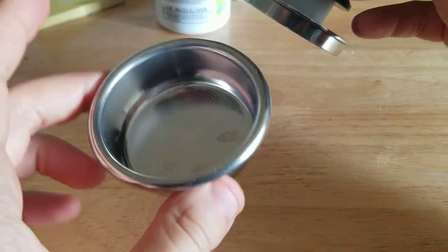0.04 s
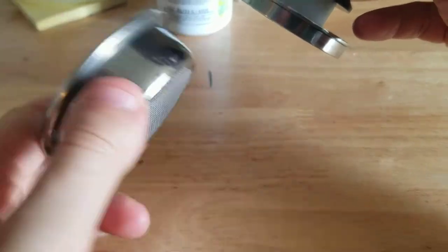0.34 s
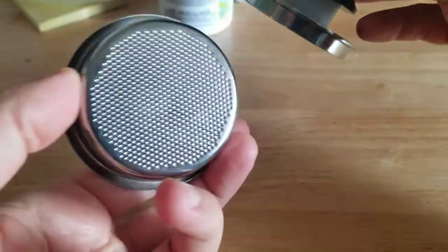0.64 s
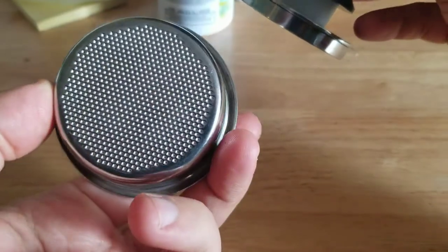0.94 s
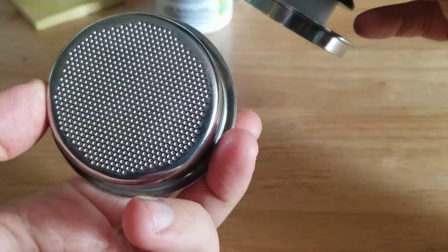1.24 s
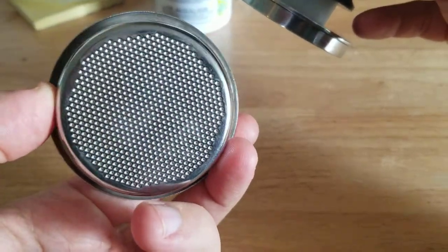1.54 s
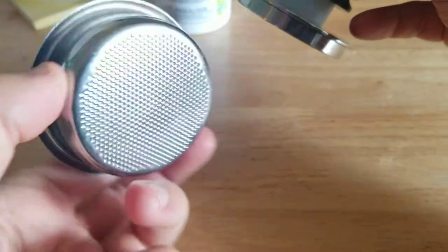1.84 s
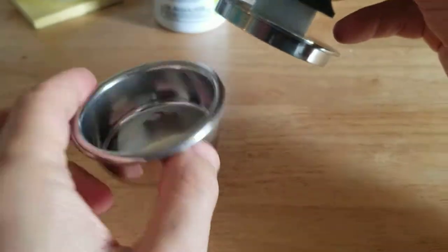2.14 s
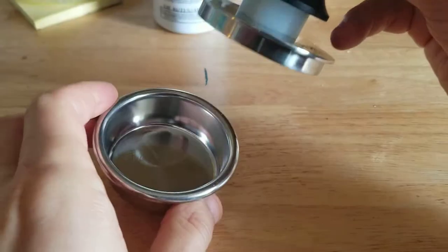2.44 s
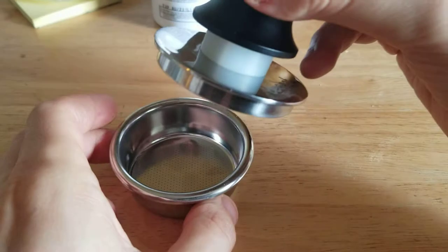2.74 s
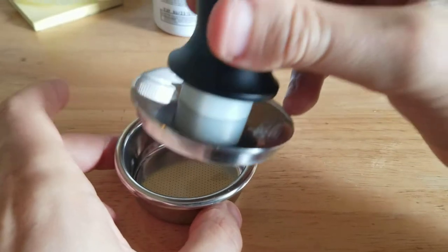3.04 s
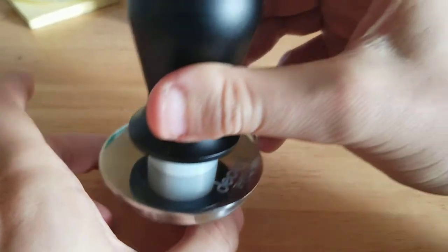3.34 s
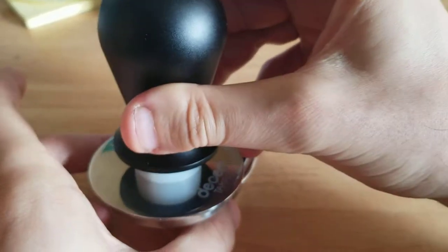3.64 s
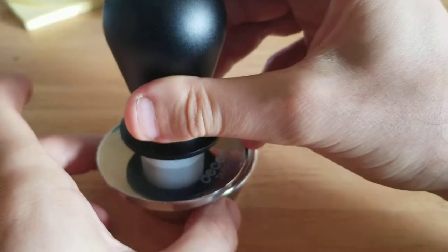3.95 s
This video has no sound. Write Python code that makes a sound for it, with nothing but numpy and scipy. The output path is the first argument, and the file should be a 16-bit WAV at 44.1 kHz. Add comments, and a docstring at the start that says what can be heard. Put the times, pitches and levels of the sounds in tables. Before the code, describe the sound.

A steel tamper clacks sharply into an espresso basket at about 3.5 seconds, with a brief ring and table thump, then a lighter click at 3.9. Earlier, fingers faintly rub the basket, with soft bumps, until about 2 seconds. It lands on a wooden table with a ringing knock at 2.4 and scrapes lightly at 2.7. Everything is close, over a low room hum.

```python
"""Espresso basket and tamper on a wooden table

A steel basket is turned twice in the fingers, set down and nudged; a steel tamper clacks into it,
thumps the table and shifts once more. Impacts excite damped modes of steel and wood, and sliding
friction gives swells of noise. The handling is close, its treble mostly on the left; a small room hums."""
import sys
import numpy as np
from scipy import signal
from scipy.fft import rfft, irfft
from scipy.io import wavfile

SR = 44100
rng = np.random.default_rng(int(sys.argv[2]) if len(sys.argv) > 2 else 0)


def file_out(sig):
    """Save sig as 16-bit WAV at sys.argv[1]."""
    # one column per channel
    cols = np.atleast_2d(sig).T
    # limit, then scale
    lim = np.clip(cols, -1, 1)
    pcm = np.round(lim * 32767).astype(np.int16)
    wavfile.write(sys.argv[1], SR, pcm)


N = 176400
T = np.arange(N) / SR
HZ = np.maximum(np.fft.rfftfreq(N, 1 / SR), 1)

# Modes of the free basket and of the table top: pitch_hz, level_db, t60_s
BASKET_MODES = [(2062, -39.5, .28), (5087, -55.5, .32), (2950, -42, .09), (7200, -69, .2), (8290, -63, .15),
                (8436, -67, .22), (9636, -69, .25), (11160, -51, .13), (11290, -46, .085),
                (12470, -58, .14), (15580, -57, .15)]
TABLE_MODES = [(203, -34, 0.075), (382, -43.5, 0.17), (487, -52, 0.29), (592, -46, 0.22), (721, -46, .11),
               (879, -30, 0.047), (1066, -51, 0.048), (1158, -34.5, 0.11), (1615, -35, 0.063)]
# Level difference of close sounds: frequency_hz, left_minus_right_db
PAN = [(200, -1), (1100, -9), (2000, 0.5), (3500, 2.5), (4300, 9.5), (6000, 14), (9000, 21.5), (12000, 9),
       (15000, 16)]
# Coherence of the two channels: frequency_hz, correlation
COHERENCE = [(60, 1), (250, 0.72), (600, 0.34), (1200, 0.017), (5000, .1), (15000, .05)]


def from_db(db):
    """Amplitude grows tenfold every 20 dB."""
    return 10 ** (np.asarray(db) / 20)


def unit_rms(x):
    """Normalisation to unit mean power."""
    return x / np.sqrt(np.mean(x ** 2) + 1e-20)


def at_hz(points, hz):
    """Interpolation on a log-frequency axis."""
    frequencies, values = np.transpose(points)
    return np.interp(np.log(hz), np.log(frequencies), values)


def panned(db):
    """A level difference splits evenly into left and right gains."""
    return from_db(np.array([[.5], [-.5]]) * db)


def noise(spectrum):
    """Partly coherent stereo noise: alike in the bass, nearly independent in the treble."""
    mid, side = rfft(rng.standard_normal((2, N)))
    alike = at_hz(COHERENCE, HZ)
    pair = np.sqrt(1 + alike) * mid + np.sqrt(1 - alike) * side * [[1], [-1]]
    return unit_rms(irfft(pair * from_db(at_hz(spectrum, HZ)), N))


def close_noise(spectrum, lean=1):
    """A level difference between the channels places noise at the hands."""
    return irfft(rfft(noise(spectrum)) * panned(lean * at_hz(PAN, HZ)), N)


def driven(response):
    """Forced vibration: white noise shaped by a frequency response."""
    return unit_rms(irfft(rfft(rng.standard_normal((2, N))) * response, N))


def drift(rate_hz):
    """Low-passed noise gives a random fluctuation of unit rms."""
    return unit_rms(irfft(rfft(rng.standard_normal(N)) / (1 + (HZ / rate_hz) ** 2), N))


def blows(times, levels_db, t60_s, attack_s):
    """Exponential decays after impacts add in power, as incoherent sounds do."""
    ages = np.maximum(T - np.array(times)[:, None], 0)
    decays = from_db(np.array(levels_db)[:, None] - np.minimum(60 * ages / t60_s, 200))
    rises = 1 - np.exp(-ages / attack_s)
    return np.sqrt(((decays * rises) ** 2).sum(0))


def strokes(slides, fade_db):
    """Gaussian swells of sliding contact, each fade_db below its peak at start and end."""
    envelope = np.zeros(N)
    for start, peak, end, db in slides:
        away = np.where(T < peak, (peak - T) / (peak - start), (T - peak) / (end - peak))
        envelope += from_db(db - np.minimum(fade_db * away ** 2, 200))
    return envelope


def ring(times, levels_db, modes, vary_db, accents=None):
    """Modal superposition: blows start damped sines; the contact point accents a band (hz, db)."""
    out, t = np.zeros((2, N + SR)), T[:SR]
    accent_octaves = .3
    for k, (start_s, db) in enumerate(zip(times, levels_db)):
        onset = int(start_s * SR)
        for hz, mode_db, t60_s in modes:
            boost_db = 0
            if accents is not None:
                accent_hz, accent_db = accents[k]
                boost_db = accent_db * np.exp(-(np.log2(hz / accent_hz) / accent_octaves) ** 2)
            phase = rng.choice([-1, 1]) * np.arccos(at_hz(COHERENCE, hz)) * np.array([[.5], [-.5]])
            gain = from_db(db + mode_db + boost_db + vary_db * rng.standard_normal())
            envelope = gain * np.exp(-np.log(1000) * t / t60_s) * (1 - np.exp(-2 * hz * t))
            tone = envelope * np.sin(2 * np.pi * hz * t + phase)
            out[:, onset:onset + SR] += panned(at_hz(PAN, hz)) * tone
    return out[:, :N]


def in_room(x, level_db=-9, t60_s=0.19, delay_s=0.0025):
    """Reverberation: dense reflections interfere with ringing tones and make them flutter."""
    t = T[:SR // 2]
    echoes = rng.standard_normal((2, len(t))) * np.exp(-np.log(1000) * t / t60_s) * (t > delay_s)
    echoes /= np.sqrt((echoes ** 2).sum(1, keepdims=True))
    return x + from_db(level_db) * signal.fftconvolve(x, echoes, axes=1)[:, :N]


def tamper_clacks():
    """Steel-on-steel impacts excite the basket's modes and pass through to a low mode of the table."""
    # Contacts: start_s, clack_db, ring_db, thump_db, accent_hz, accent_db
    contacts = [(3.5466, -3, -14, -22, 12000, -7), (3.5486, 0, -2.5, -1.5, 11400, 1.5),
                (3.5525, -17, -16, -17, 6400, 10), (3.602, -28, -30, -24, 4200, 14),
                (3.912, -15.5, -23, -16, 4900, 19), (3.928, -27, -39, -20, 4200, 19)]
    # Modes of the basket holding the tamper: pitch_hz, level_db, t60_s
    loaded_modes = [(1670, -39.5, 0.12), (1967, -35, 0.16), (2308, -38, 0.14), (3020, -38, 0.13),
                    (4157, -26.5, 0.022), (4334, -35, 0.037), (5540, -34.5, 0.091), (6350, -30, 0.048),
                    (7311, -34.5, 0.15), (7090, -42, 0.064), (8760, -38, 0.056), (10450, -36, 0.087),
                    (10900, -45, 0.109), (11330, -29.5, 0.16), (11310, -37, .09), (11400, -34, 0.092),
                    (12000, -32, .06), (12470, -32, 0.12), (14300, -31.5, .07), (14690, -48.5, .09)]
    # Spectra of the clack and of its reverberation: frequency_hz, density_db
    clack_spectrum = [(300, -15), (1200, -15), (1800, 2), (3000, -6), (4400, -2), (5200, -13), (6400, 2.5),
                      (9400, -26.5), (11400, 7.5), (13200, 0.5), (14500, -4), (16000, -4)]
    room_spectrum = [(300, 7), (1100, -7.5), (1800, 7), (3000, 6.5), (5000, -6), (7000, -4), (9300, -18),
                     (11400, -13), (13200, -11), (16000, -5)]
    times, clack_db, ring_db, thump_db, accent_hz, accent_db = np.transpose(contacts)
    clack = blows(times, clack_db - 21, t60_s=0.033, attack_s=0.00045) * close_noise(clack_spectrum)
    clack *= from_db(2 * drift(700))
    room = blows(times, clack_db - 40, t60_s=0.31, attack_s=0.0054) * close_noise(room_spectrum, 0.94)
    thump = ring(times, thump_db, modes=[(210.7, -22.5, 0.12)], vary_db=2)
    rings = ring(times, ring_db, loaded_modes, vary_db=1.5, accents=list(zip(accent_hz, accent_db)))
    return clack + room + thump + in_room(rings)


def tamper_rub(width_hz=135):
    """Friction of the tamper drives the resonances of the basket wall."""
    # Rubbing strokes: start_s, peak_s, end_s, level_db
    rubs = [(3.62, 3.7, 3.8, -68), (3.869, 3.982, 4.08, -60)]
    # Wall resonances: pitch_hz, level_db
    resonances = [(1620, 4), (1938, -4.5), (5550, -3.5), (7340, -6), (10450, -2)]
    wall = sum(from_db(db) / (1 + 2j * (HZ - hz) / width_hz) for hz, db in resonances)
    return strokes(rubs, fade_db=15.5) * driven(wall * panned(0.69 * at_hz(PAN, HZ)))


def basket_rattle():
    """Contact chatter: under the tamper the basket strikes the wood repeatedly."""
    # Contacts: start_s, level_db
    contacts = [(3.55, -37), (3.557, -30), (3.6018, -38), (3.915, -43.5), (3.926, -43)]
    # Rattle spectrum: frequency_hz, density_db
    spectrum = [(400, -25.5), (1200, -10), (1800, 6), (2500, 2.5), (3400, -4.5), (4300, -0.5), (5200, -22),
                (16000, -39)]
    return blows(*np.transpose(contacts), t60_s=0.04, attack_s=0.0012) * close_noise(spectrum)


def basket_landing():
    """The rim's impact on wood gives a broadband knock and leaves basket and table in free vibration."""
    # Rim contacts: start_s, level_db
    landings = [(2.4393, 0), (2.4445, -11.5)]
    # Wooden knock: frequency_hz, density_db
    spectrum = [(120, -14), (300, 4), (620, 0.5), (850, -4), (1500, 1), (2300, 1), (3000, -10.5),
                (4000, -24.5), (6500, -29.5), (9000, -57), (16000, -37)]
    times, db = np.transpose(landings)
    knock = blows(times, db - 30, t60_s=0.056, attack_s=0.00054) * close_noise(spectrum)
    room = blows(times, db - 40, t60_s=0.26, attack_s=0.0055) * close_noise(spectrum, lean=0.39)
    rings = ring(times[:1], [0], BASKET_MODES + TABLE_MODES, vary_db=.5)
    return knock + room + in_room(rings)


def basket_nudge():
    """Sliding friction makes a scrape; a catch on the wood sets table and basket ringing."""
    # Slides: start_s, peak_s, end_s, level_db
    slides = [(2.604, 2.634, 2.84, -67), (2.657, 2.686, 2.7, -65), (2.687, 2.706, 2.76, -86)]
    # Steel sliding on wood: frequency_hz, density_db
    spectrum = [(250, -11), (450, 8), (700, -7), (900, -3.5), (1250, 0.5), (1550, -15), (3000, -32),
                (9000, -37), (11200, -20), (16000, -38)]
    # The catch: start_s, table_db, basket_db
    catch = [(2.669, -26.5, -33.5)]
    scrape = strokes(slides, fade_db=12.5) * close_noise(spectrum) * from_db(1.2 * drift(150))
    times, table_db, basket_db = np.transpose(catch)
    wood = ring(times, table_db, TABLE_MODES, vary_db=1, accents=[(930, 10)])
    steel = ring(times, basket_db, BASKET_MODES, vary_db=1, accents=[(9800, 19)])
    return scrape + wood + steel


def finger_slides(half_width_hz=640):
    """Skin friction makes a grainy hiss; where a fingertip catches, the steel resonates faintly."""
    # Turning strokes: start_s, peak_s, end_s, level_db
    turns = [(0.314, 0.345, 0.35, -77.5), (0.328, .5, 0.63, -69), (1.825, 1.9, 1.98, -72.5),
             (1.896, 2.007, 2.15, -67.5)]
    # Skin on steel: frequency_hz, density_db
    skin = [(1500, -9), (3500, -12), (5000, -10.5), (6100, -1.5), (8500, -12), (11000, 0), (13000, 5.5),
            (16000, -4.5)]
    # Fingertip catches: start_s, peak_s, end_s, pitch_hz, level_db
    catches = [(0.476, 0.544, 0.64, 6440, -75), (1.88, 1.957, 2.0, 6440, -65.5),
               (2.894, 2.923, 2.96, 11500, -71)]
    out = strokes(turns, fade_db=8) * close_noise(skin, lean=1.46)
    out *= from_db(-3.5 + 0.94 * drift(22) + 1.4 * drift(440))
    for start, peak, end, hz, db in catches:
        singing = driven(panned(at_hz(PAN, HZ)) / (1 + ((HZ - hz) / half_width_hz) ** 2))
        out += strokes([(start, peak, end, db)], fade_db=35) * singing * from_db(2 * drift(60))
    return out


def finger_taps():
    """Heavily damped impacts of fingertips on the basket give noise bursts with a reverberant tail."""
    # Taps: start_s, level_db, band_hz, t60_s
    taps = [(1.405, -59, 580, 0.016), (1.962, -53.5, 2780, 0.015), (2.776, -67, 1200, 0.018)]
    out = np.zeros((2, N))
    for start_s, db, hz, t60_s in taps:
        direct = blows([start_s], [db], t60_s, attack_s=0.00041)
        room = blows([start_s], [db - 14.5], t60_s=0.28, attack_s=0.0068)
        spectrum = [(hz / 2.3, -22), (hz / 1.24, 0), (hz * 0.61, -4), (hz * 3, -17), (hz * 6, -42)]
        out += (direct + room) * close_noise(spectrum)
    return out


def table_bumps(t60_s=0.091):
    """Each soft jolt of the hands excites one low, damped vibration of the table."""
    # Jolts: start_s, pitch_hz, level_db
    jolts = [(1.293, 146, -35), (1.402, 107, -47), (1.756, 144, -48), (1.951, 143, -50),
             (3.548, 137.8, -29.5), (3.914, 74, -32.5), (3.929, 192, -39)]
    return sum(ring([start_s], [db], [(hz, 0, t60_s)], vary_db=3.5) for start_s, hz, db in jolts)


def room_noise():
    """Stationary noise: low room rumble and microphone hiss."""
    # Noise floor of each channel: frequency_hz, density_db
    left = [(20, -17), (50, 6), (90, -1), (150, -7), (280, -14.5), (400, -24), (600, -36), (900, -38.5),
            (2000, -41.5), (3500, -49.5), (5900, -50), (6350, -42), (7200, -53), (9700, -53.5),
            (10700, -42), (15800, -40.5)]
    right = [(20, -18.5), (50, 6.5), (90, -1), (150, -7.5), (280, -16), (400, -21.5), (600, -32.5),
             (900, -41), (1250, -36.5), (2000, -45), (3500, -51), (7000, -59), (9700, -62.5), (10400, -50),
             (12300, -38), (14000, -45.5), (15800, -37)]
    # Rms levels: left_db, right_db
    levels = (-49, -46.5)
    white = rfft(noise([(20, 0), (20000, 0)]))
    return np.array([from_db(db) * unit_rms(irfft(channel * from_db(at_hz(spectrum, HZ)), N))
                     for channel, spectrum, db in zip(white, (left, right), levels)])


def appliance_hum():
    """Random modulation of amplitude and phase makes an appliance's hum waver; its upper lines swell."""
    # Spectral lines: pitch_hz, level_db, waver_depth
    partials = [(58.87, -43.5, .35), (280, -64.5, 0.5), (303, -71, .6), (712, -84.5, 0.4)]
    # Swell of the upper lines: time_s, gain_db
    swell = [(0, -3), (1.2, -3), (1.7, 0.5), (2.5, 4), (3.2, -1), (4, 2)]
    lines = []
    for hz, db, depth in partials:
        waver = 1 + depth * (drift(2.9) + 1j * drift(7.6))
        lines.append(from_db(db) * unit_rms(np.real(waver * np.exp(2j * np.pi * hz * T))))
    upper = sum(lines[1:]) * from_db(np.interp(T, *np.transpose(swell)))
    return panned(-2.3) * (lines[0] + upper)


def scene():
    """Superposition: the pressures of all sources add at the microphone."""
    handling = finger_slides() + finger_taps() + basket_landing() + basket_nudge()
    tamping = tamper_clacks() + tamper_rub() + basket_rattle()
    return handling + tamping + table_bumps() + room_noise() + appliance_hum()


def record(dry, fade_in_s=0.0067, cutoff_hz=15900):
    """Band limiting: after a brief fade-in, a steep low-pass filter removes the highest treble."""
    lowpass = signal.ellip(12, .1, 90, cutoff_hz, fs=SR, output="sos")
    return signal.sosfilt(lowpass, dry * np.minimum(T / fade_in_s, 1))


dry = scene()
out = record(dry)
file_out(out)
```